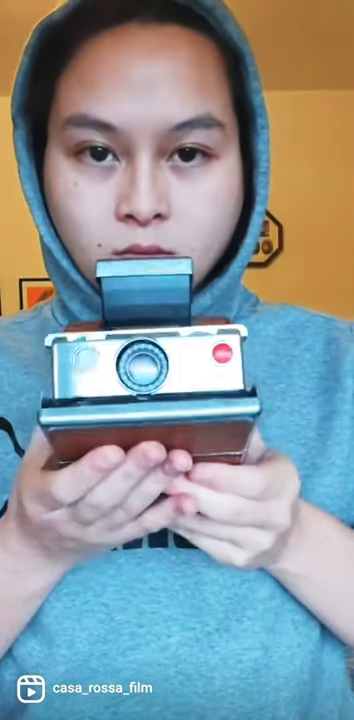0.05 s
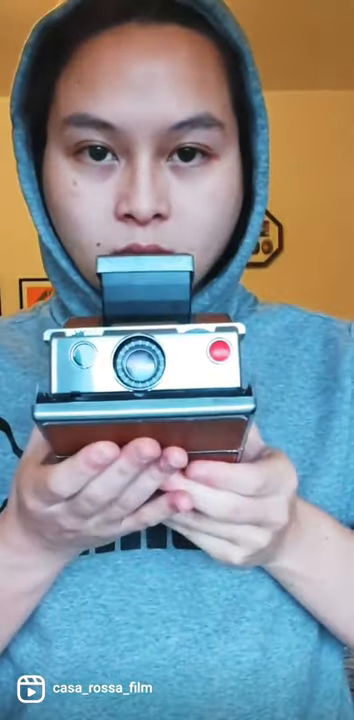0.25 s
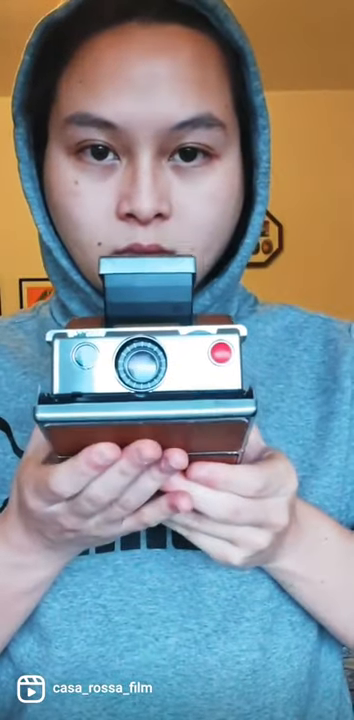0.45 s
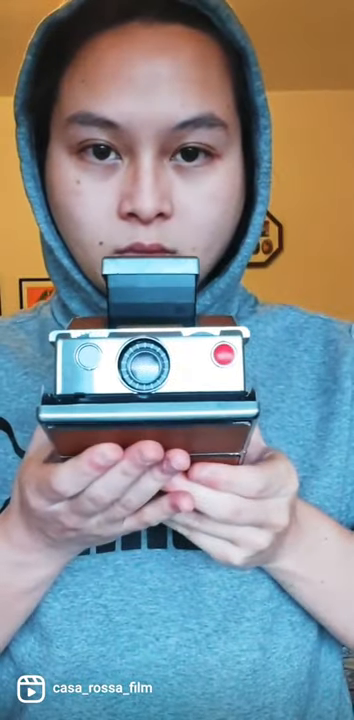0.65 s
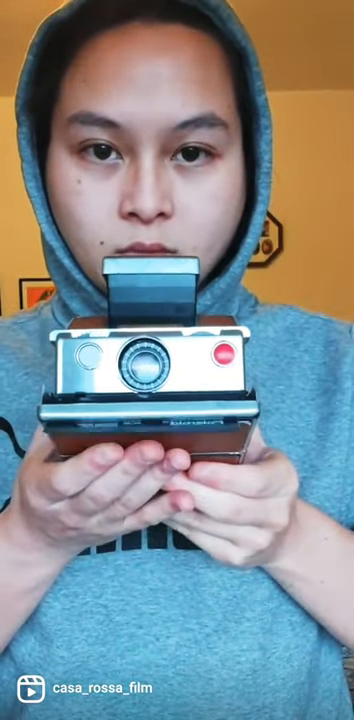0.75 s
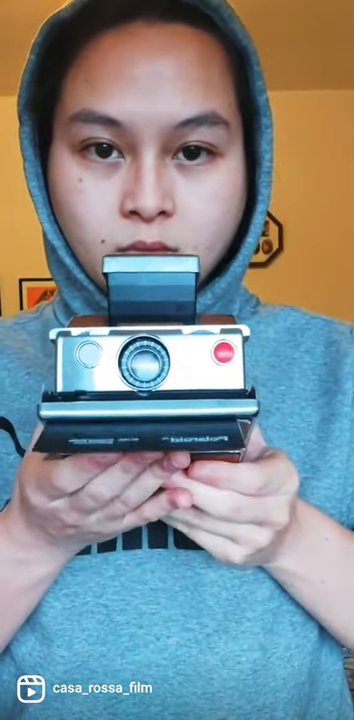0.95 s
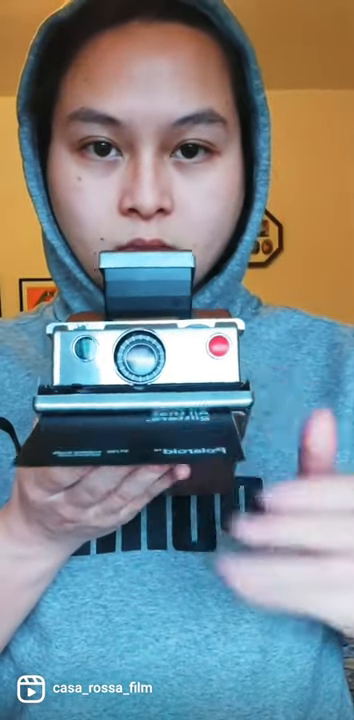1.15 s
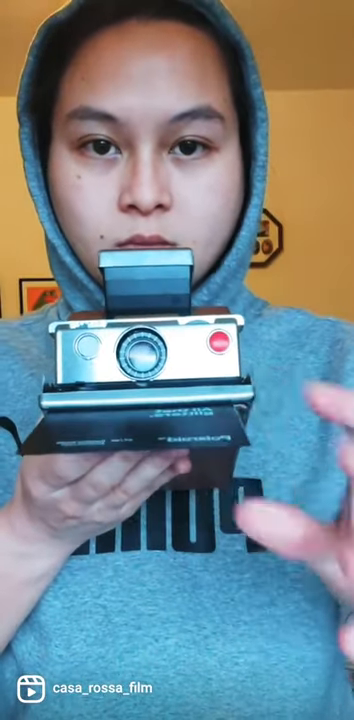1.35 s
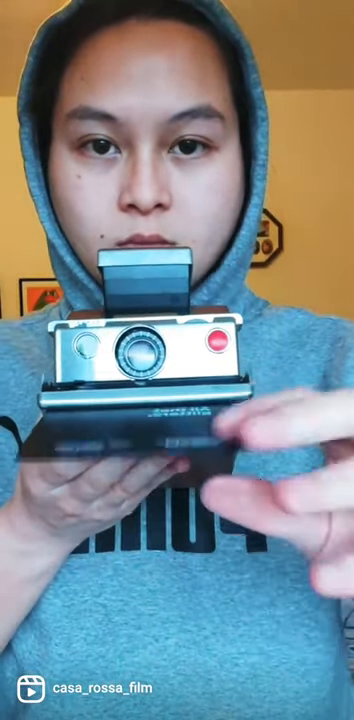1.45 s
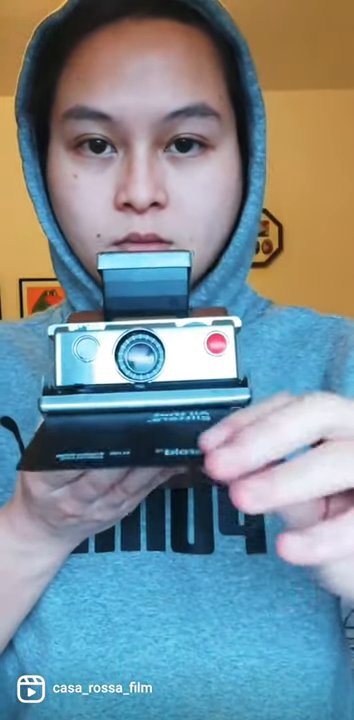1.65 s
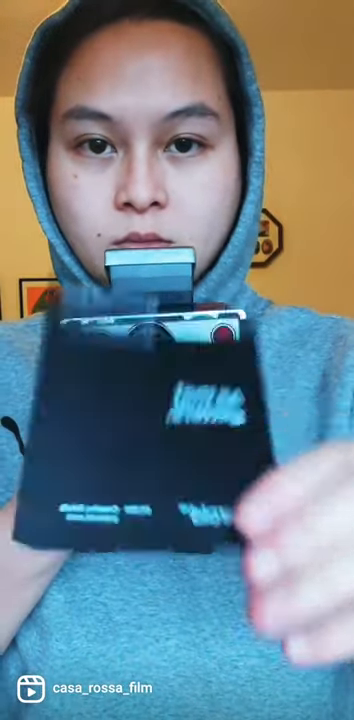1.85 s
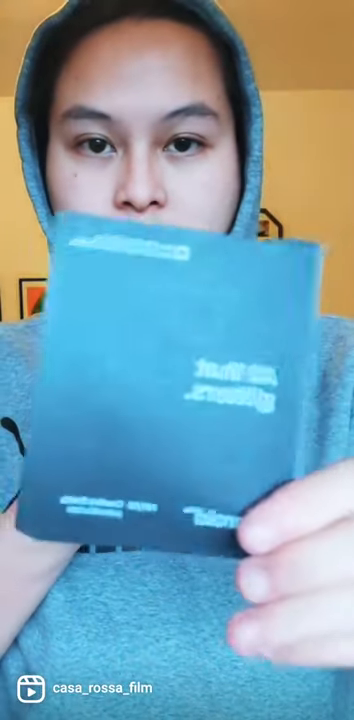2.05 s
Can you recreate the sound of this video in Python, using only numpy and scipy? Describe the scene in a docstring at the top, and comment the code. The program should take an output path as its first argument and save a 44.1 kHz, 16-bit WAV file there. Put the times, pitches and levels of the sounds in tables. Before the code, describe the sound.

A folding instant camera takes a picture with sharp shutter and mirror clacks while its small motor whirs and rattles. A latch snaps, the motor stops, and the sheet starts sliding out, close to the microphone in a small room.

```python
"""A folding instant camera takes a picture and ejects the sheet, close to one microphone in a small room.
The button ticks, shutter and mirror clack, and a small motor whirs through a gear train that drives
the rollers. A latch snaps as the load comes off, the motor stops, and fingers start to slide the
sheet out. The room adds a short tail over a quiet noise floor."""
import sys
import numpy as np
from scipy import signal
from scipy.fft import rfft, irfft
from scipy.io import wavfile

SR = 44100
rng = np.random.default_rng(int(sys.argv[2]) if len(sys.argv) > 2 else 0)


def to_wav(s):
    """Save 16-bit WAV."""
    ch = np.atleast_2d(s).T  # columns
    pcm = np.round(np.clip(ch, -1, 1) * 32767)  # PCM
    wavfile.write(sys.argv[1], SR, pcm.astype(np.int16))


N = 92610
T = np.arange(N) / SR
CONTACT_S = 0.0005  # rise time of a hard contact

# Dry rubbing of button and sheet. Each row: frequency in Hz, relative level in dB.
RUB_COLOUR = [(100, -34), (330, -25.5), (900, -11), (1400, -13), (1630, 4.5), (1800, -3.5), (2300, -1.5),
              (2900, -5), (3250, -8.5), (4400, -10), (7000, -29)]
# Bright hiss of brushes, rollers and sheet. Each row: frequency in Hz, relative level in dB.
HISS_COLOUR = [(100, -29.5), (3000, 1.5), (4200, 3.5), (4950, 0.5), (6400, -3), (6950, -10), (7800, -5.5),
               (9200, -4), (11000, 1), (12800, 2.5), (14400, -5)]


def amp(db):
    """Decibels to gain."""
    return 10 ** (np.asarray(db) / 20)


def unit(x):
    """Scales to rms 1."""
    return x / np.sqrt(np.mean(x ** 2) + 1e-20)


def curve(rows, column=1):
    """One column of a time table, for every sample."""
    rows = np.array(rows)
    return np.interp(T, rows[:, 0], rows[:, column])


def at_frequency(points, hz):
    """Interpolates a table on a log-frequency axis."""
    f, value = np.transpose(points)
    return np.interp(np.log(hz + 1), np.log(f + 1), value)


def colour(x, points):
    """Causal filter of unit energy with the given spectrum."""
    log_gain = np.log(amp(at_frequency(points, abs(np.fft.fftfreq(4096, 1 / SR)))))
    taps = np.fft.ifft(np.exp(np.conj(signal.hilbert(log_gain)))).real[:2048]
    return signal.fftconvolve(x, taps / np.linalg.norm(taps))[:N]


def resonate(x, hz, width_hz):
    """A resonance of gain 1."""
    return signal.lfilter(*signal.iirpeak(hz, hz / width_hz, SR), x)


def drift(rate_hz):
    """Random motion of rms 1, mostly slower than the given rate."""
    hz = np.fft.rfftfreq(N, 1 / SR)
    return unit(irfft(rfft(rng.standard_normal(N)) / (1 + (hz / rate_hz) ** 4), N))


def grit(spread_db):
    """Dense tiny impacts of uneven size."""
    return unit(rng.standard_normal(N) * amp(spread_db * np.clip(drift(1300), -2, 2)))


def ring(modes, start, rise=CONTACT_S):
    """Damped modes struck at one moment."""
    t = np.maximum(T[:SR // 3] - start % (1 / SR), 0)
    sound = sum(amp(db - 60 * t / t60) * np.cos(2 * np.pi * hz * t) for hz, db, t60 in modes)
    sound *= 1 - np.exp(-t / rise)
    sound = signal.lfilter(*signal.butter(3, 160, "high", fs=SR), sound)
    return np.concatenate([np.zeros(int(start * SR)), sound, np.zeros(N)])[:N]


def burst(start, decay, rise=CONTACT_S):
    """Quick rise and exponential fall, times in seconds."""
    t = np.maximum(T - start, 0)
    return (1 - np.exp(-t / rise)) * np.exp(-t / decay)


def button():
    """The shutter button ticks and rubs in its guide."""
    # Ticks under the finger. Each row: start in seconds, level in dB.
    presses = [(.141, -75.5), (.185, -52.5)]
    # The button's modes. Each row: frequency in Hz, relative level in dB, t60 in seconds.
    modes = [(458, -8, 0.25), (1100, 2.5, 0.036), (1680, -0.5, 0.14), (2400, -4.5, 0.099), (4130, -7, 0.12)]
    sound = np.zeros(N)
    for start, db in presses:
        rub = colour(rng.standard_normal(N) * burst(start, decay=0.051), RUB_COLOUR)
        sound += amp(db) * (ring(modes, start) + amp(-6.5) * rub)
    return sound


def blows():
    """Each blow cracks, rings case, latch and mirror, shakes loose parts and snaps metal on metal."""
    # Blows of the mechanism. Each row: start in seconds, levels of case, latch, mirror, clatter
    # and snap in dB, decay of clatter and snap in seconds.
    strikes = [(0.2259, -18.5, -20.5, -49, -30.5, -38, 0.016), (.2438, -20, -29, -55, -21, -22, 0.0025),
               (.2495, -18, -27.5, -59, -32, -33, 0.016), (.299, -27, -41, -39, -49, -50, 0.0057),
               (0.388, -33.5, -13.5, -62, -25, -25.5, 0.0042), (.478, -34, -30, -28, -28.5, -38, 0.0045),
               (0.4803, -29, -39, -13.5, -29.5, -33, 0.0072), (.498, -40, -46, -32.5, -44, -55, 0.0065),
               (0.5134, -19, -46, -30, -42, -55, 0.016), (.541, -24, -52.5, -31, -37, -55, .004),
               (0.5545, -30, -22, -29, -21.5, -34, 0.0071), (1.4813, -38.5, -18, -58, -26.5, -25, 0.0084),
               (1.485, -44.5, -20.5, -59.5, -30.5, -42, 0.0048), (1.5025, -35.5, -34, -33, -33, -32, 0.017),
               (1.81, -36, -29, -47.5, -42, -37, .004)]
    # Modes of the struck parts. Each row: frequency in Hz, relative level in dB, t60 in seconds.
    case = [(340.7, -23, 0.25), (456, -6.5, 0.1), (625, -4.5, 0.1), (1086, -19, 0.051)]
    latch = [(1294, -12, 0.065), (1655, -0.5, 0.03), (2040, -9.5, 0.038), (2334, -10, 0.05),
             (3053, -17.5, 0.048), (3200, -21, 0.07)]
    mirror = [(226.5, -19, 0.26), (287.7, -12.5, 0.18), (500, -4.5, 0.078), (618, -8, 0.042),
              (676, 3.5, 0.058), (765, -19.5, 0.14)]
    # Spectra of loose parts and of snapping metal. Each row: frequency in Hz, relative level in dB.
    clatter_colour = [(40, -24.5), (120, -17.5), (250, -10), (500, 2.5), (750, -2.5), (930, -3),
                      (1200, 5.5), (1500, -2), (2200, 3.5), (2700, -9), (3600, -7.5), (5000, -18),
                      (7000, -30), (15000, -29)]
    snap_colour = [(200, -38), (1300, -1), (2100, 3), (3600, 0), (5000, -9.5), (7000, -18), (12500, -9.5)]
    rings, shake, snap, cracks = np.zeros((4, N))
    for start, case_db, latch_db, mirror_db, clatter_db, snap_db, decay in strikes:
        for modes, db in (case, case_db), (latch, latch_db), (mirror, mirror_db):
            rings += amp(db) * ring(modes, start)
        shake += amp(clatter_db) * burst(start, decay)
        snap += amp(snap_db) * burst(start, decay)
        cracks[int(start * SR)] = amp(clatter_db + 18)
    clatter = colour(cracks + grit(2.2) * shake, clatter_colour)
    return rings + clatter + colour(grit(2.9) * snap, snap_colour)


def motor():
    """The motor starts, wavers in speed under load and brakes; returns its whine and its whir."""
    # The shaft's speed. Each row: time in seconds, turns per second.
    speed = [(.226, 109.5), (.28, 151), (.4, 159), (.55, 160), (.645, 162), (.705, 173), (.775, 161.5),
             (.87, 171.5), (.98, 164), (1.1, 163), (1.19, 168), (1.41, 169.6), (1.53, 180.5), (1.62, 182.5),
             (1.81, 183)]
    start_s, stop_s, spin_up_s, brake_s = 0.226, 1.82, 0.012, 0.0089
    angle = 2 * np.pi * np.cumsum(curve(speed) * (1 + 0.00302 * drift(39))) / SR
    running = np.clip((T - start_s) / spin_up_s, 0, 1) * np.exp(-np.maximum(T - stop_s, 0) / brake_s)
    return gear_whine(angle) * running, gear_whir(angle, running)


def gear_whine(angle):
    """Tones at multiples of the shaft speed, each rough in level and phase."""
    # Strong tones. Each row: time in seconds, levels of the 3rd, 4th and 8th multiple in dB.
    levels = [(.25, -42.5, -52, -49), (.61, -57, -42.5, -51), (.68, -39, -49, -51), (.745, -53, -45, -52),
              (.8, -42, -51, -49.5), (.88, -40, -44.5, -46.5), (.95, -47.5, -48, -49.5),
              (1.17, -54, -44.5, -48), (1.44, -44, -46, -48), (1.56, -53.5, -47, -64.5),
              (1.68, -46.5, -49.5, -56), (1.8, -51, -54, -72)]
    # Weaker tones. Each row: multiple of the shaft speed, level in dB.
    weak = [(1, -71.5), (5, -60), (6, -58), (10, -62), (11, -57.5), (14, -57.5), (18, -59)]
    strong = [(3, curve(levels, 1)), (4, curve(levels, 2)), (8, curve(levels, 3))]
    whine = np.zeros(N)
    for multiple, db in strong + weak:
        roughness = 1 + 0.28 * drift(31)
        phase = multiple * (angle + 0.03 * drift(54)) + 2 * np.pi * rng.random()
        whine += amp(db) * np.sqrt(2) * roughness * np.sin(phase)
    return whine


def gear_whir(angle, running):
    """Gear teeth rattle and ring in the case while brushes and rollers hiss."""
    # Course of the rattle and of the hiss. Each row: time in seconds, level in dB.
    rattle_level = [(.23, -41.5), (.35, -39), (.6, -37), (.8, -38.5), (1.05, -41), (1.3, -40),
                    (1.45, -38.5), (1.65, -41), (1.81, -39.5)]
    hiss_level = [(.23, -56), (.36, -44), (.6, -42.5), (1.0, -42), (1.5, -44), (1.81, -46)]
    # The rattle's spectrum. Each row: frequency in Hz, relative level in dB.
    rattle_colour = [(60, -42.5), (215, -29.5), (290, -8.5), (450, 4.5), (590, -1.5), (800, 4), (920, -7.5),
                     (1100, 1), (1350, 3.5), (1480, -1), (1640, 7.5), (1950, 1), (2350, 3), (2600, -3),
                     (3000, 1), (3600, -7.5), (4400, -6.5), (5200, -14), (7000, -29), (15000, -32)]
    # Bright gear resonances. Each row: frequency in Hz, width in Hz, level in dB against the hiss.
    resonances = [(5298, 120, -10.5), (5847, 520, -9.5)]
    mesh = unit(np.exp(0.25 * np.cos(2 * angle)))  # the teeth bite twice a turn
    impacts = grit(-2.5) * mesh * amp(curve(rattle_level) + 0.88 * drift(32))
    rattle = colour(impacts * running, rattle_colour)
    rub = amp(curve(hiss_level) + 0.5 * drift(50)) * running
    hiss = colour(grit(0.93) * rub, HISS_COLOUR)
    zing = np.zeros(N)
    for hz, width, db in resonances:
        band = resonate(mesh * rng.standard_normal(N), hz, width)
        zing += amp(db) * unit(resonate(band, hz, width))
    return rattle + hiss + zing * rub


def load_bumps_and_tones():
    """Brief low bumps and narrow ringing tones from the gears and rollers under load."""
    # Bumps and tones. Each row: start in seconds, level in dB, frequency in Hz, decay in seconds.
    events = [(.68, -40.5, 1662, 0.17), (.925, -42, 450.3, 0.042), (1.0, -41, 1146, 0.084),
              (1.406, -37.5, 441, 0.048), (1.41, -49.5, 251, 0.085), (1.451, -34.5, 442.7, 0.045),
              (1.491, -41, 151, 0.038), (1.797, -33, 430, .012)]
    sound = np.zeros(N)
    for start, db, hz, decay in events:
        phase = 2 * np.pi * hz * T
        band = drift(37) * np.cos(phase) + drift(37) * np.sin(phase)
        sound += amp(db) * burst(start, decay, rise=0.0046) * band
    return sound


def spring():
    """A short metal ring, probably a spring, as the load comes off."""
    # The metal's modes. Each row: frequency in Hz, level in dB, t60 in seconds.
    modes = [(1614, -10, 0.038), (3690, -37, 0.051), (11600, -27.5, 0.017)]
    return ring(modes, start=1.5035, rise=0.0018)


def sheet_slide():
    """The sheet rubs along the slot, louder and brighter as it gathers speed."""
    start_s, rise_s = 1.992, 0.096
    speed = np.clip((T - start_s) / rise_s, 0, 1)
    rub = colour(grit(1.4) * amp(-38.5) * speed ** 2, RUB_COLOUR)
    fizz = colour(rng.standard_normal(N) * amp(-55) * speed ** 4.5, HISS_COLOUR)
    return rub + fizz


def room_tail(x):
    """The small room answers with a diffuse tail in which each band dies at its own speed."""
    # The room's decay. Each row: frequency in Hz, t60 in seconds.
    decay = [(150, 0.46), (400, 0.19), (700, 0.49), (1200, 0.18), (2200, 0.29), (5000, 0.26), (12000, 0.2)]
    hz, t, bands = signal.stft(rng.standard_normal(SR // 2), SR, nperseg=256)
    bands *= amp(-60 * t / at_frequency(decay, hz)[:, None])
    tail = signal.istft(bands, SR, nperseg=256)[1]
    tail *= np.clip((T[:len(tail)] - 0.004) / 0.009, 0, 1)  # first reflections after 4 ms
    return signal.fftconvolve(x, tail / np.linalg.norm(tail))[:N]


def standing_waves(x):
    """The motor keeps the room's standing waves ringing."""
    # Room modes. Each row: frequency in Hz, t60 in seconds, gain in dB.
    modes = [(658, .55, -6), (731, 0.51, -0.5)]
    return sum(amp(db) * resonate(x, hz, np.log(1000) / np.pi / t60) for hz, t60, db in modes)


def scene():
    """The camera close to the microphone, the room around it and a quiet noise floor, in mono."""
    # The noise floor, mostly low rumble. Each row: frequency in Hz, relative level in dB.
    floor_colour = [(25, -11.5), (50, -1), (110, 0), (170, -21), (300, -9.5), (500, -16), (7000, -32.5),
                    (14000, -30.5)]
    whine, whir = motor()
    contacts = button() + blows() + load_bumps_and_tones() + spring() + sheet_slide()
    room = room_tail(amp(-12.5) * contacts + amp(-9) * whir + amp(-14.5) * whine)
    room += standing_waves(whine + whir)
    floor = amp(-74.5) * colour(rng.standard_normal(N), floor_colour)
    return (whine + whir + contacts + room + floor)[None]


def record(dry):
    """A narrow dip near 7 kHz in the treble, with the very top cut off."""
    dip_hz, dip_width_hz, edge_hz = 6970, 440, 14250
    heard = signal.lfilter(*signal.iirnotch(dip_hz, dip_hz / dip_width_hz, SR), dry)
    lowpass = signal.firwin(1023, edge_hz, window=("kaiser", 9), fs=SR)
    return signal.oaconvolve(heard, lowpass[None], "same")


dry = scene()
out = record(dry)
to_wav(out)
```